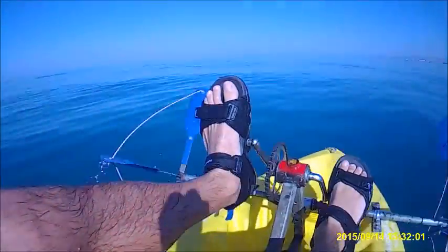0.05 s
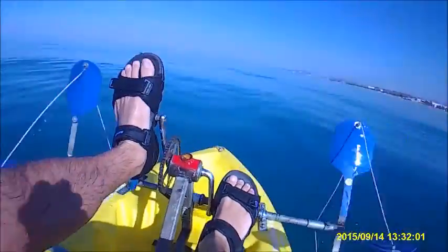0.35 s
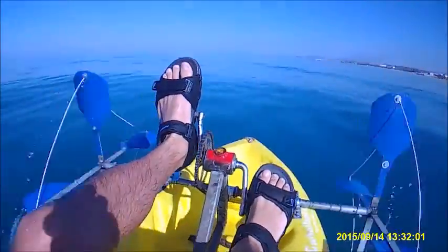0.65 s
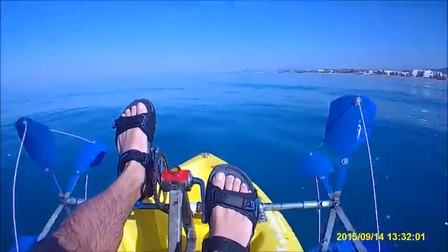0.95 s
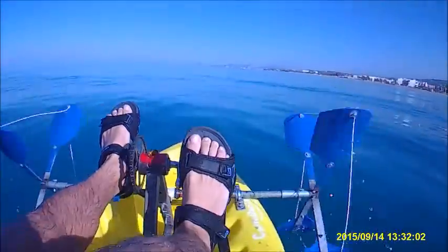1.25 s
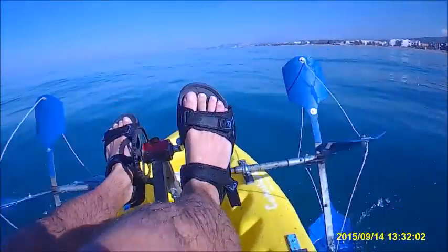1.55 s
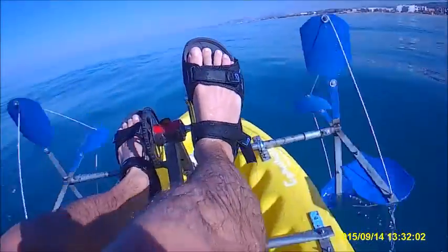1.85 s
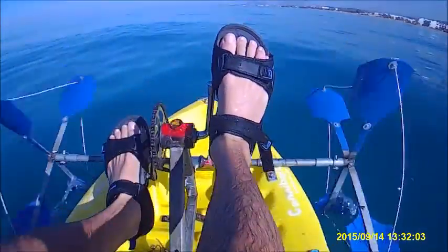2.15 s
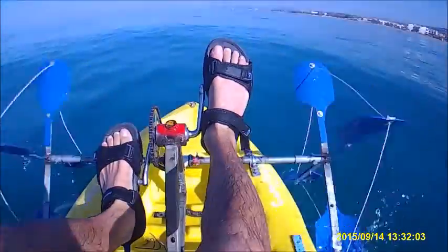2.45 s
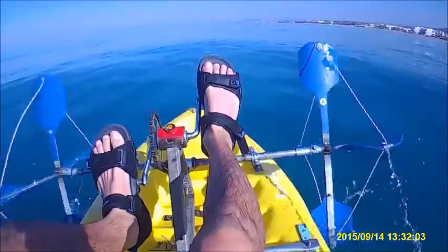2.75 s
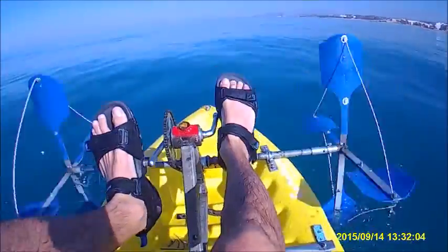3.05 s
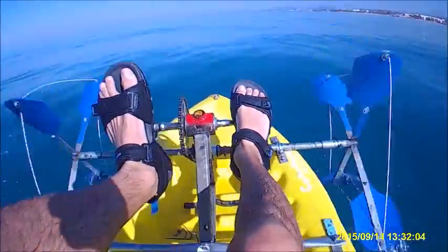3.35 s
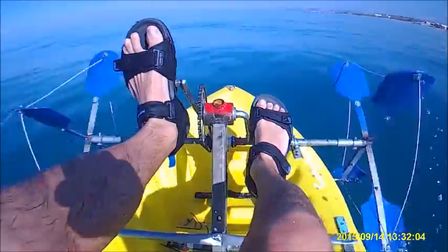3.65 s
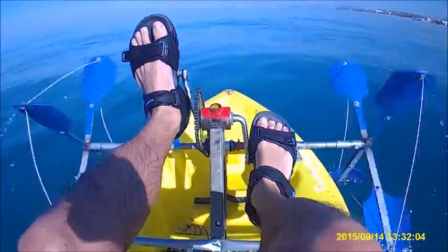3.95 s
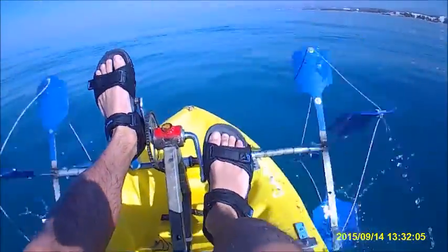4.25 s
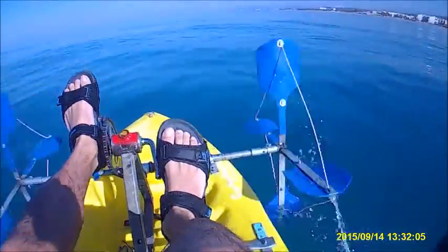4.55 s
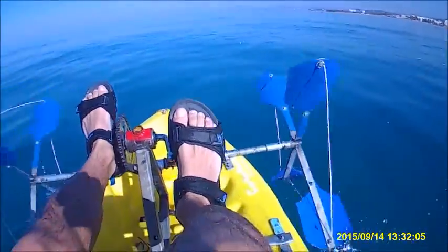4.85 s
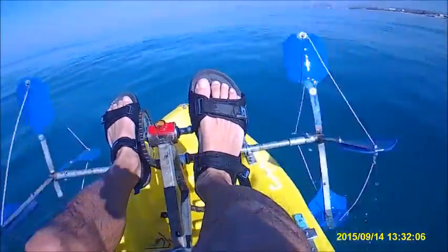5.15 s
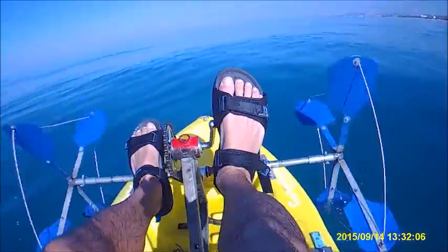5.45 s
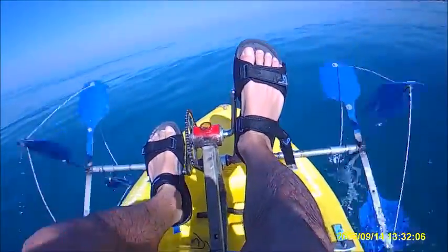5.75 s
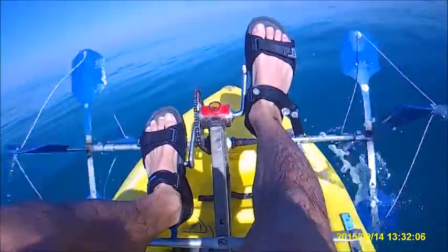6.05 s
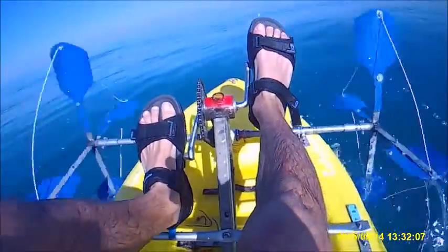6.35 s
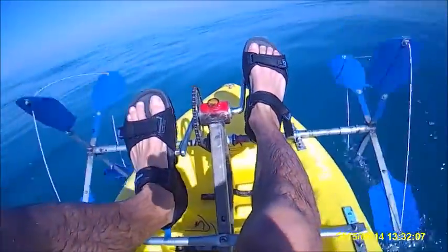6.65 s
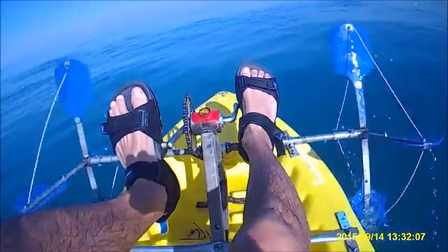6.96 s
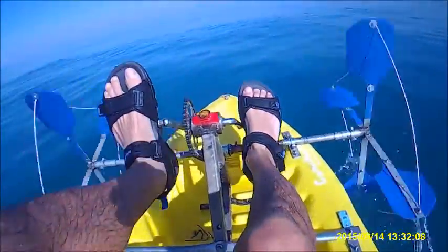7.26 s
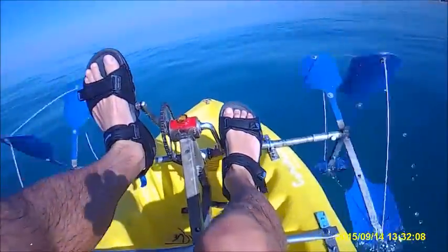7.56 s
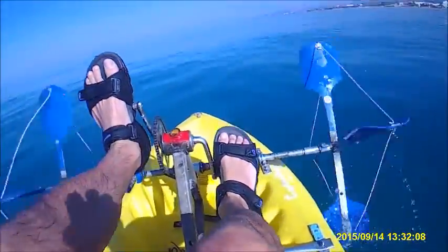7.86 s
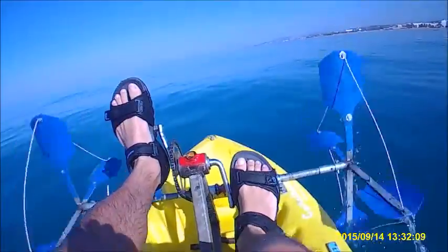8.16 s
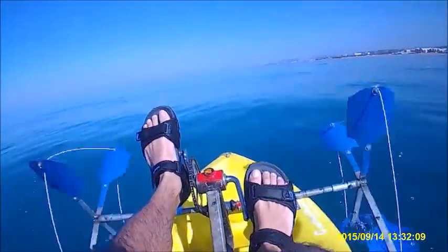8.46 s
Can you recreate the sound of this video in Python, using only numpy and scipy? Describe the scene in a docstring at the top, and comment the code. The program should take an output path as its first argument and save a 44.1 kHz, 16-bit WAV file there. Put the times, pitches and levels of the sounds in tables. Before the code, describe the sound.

A few rubs and knocks sound on a camera's plastic case, right at the microphone, as wind rumbles over it. A pedal kayak's paddle wheels churn a calm sea in repeated swells, with plopping bubbles, spray and drips. Water gurgles and thumps softly under the hollow hull. Toward the end the wind rises and a run of waves smacks the hull with low booms.

```python
"""First you hear rubs and knocks on a camera's waterproof plastic case, while wind rumbles on it.
The camera rides a pedal kayak across a calm sea. With each push on the pedals, two paddle wheels
churn up ringing bubbles and shed spray. Water gurgles under the hollow plastic hull, and small waves
and gusts of wind make soft low thumps. Near the end a run of waves smacks the hull hard,
booming with the air they trap."""
import sys
import numpy as np
from scipy import signal
from scipy.io import wavfile

SR = 44100
rng = np.random.default_rng(int(sys.argv[2]) if len(sys.argv) > 2 else 0)


def store_pcm(level_fs):
    """Save levels as 16-bit WAV."""
    pcm = np.round(np.clip(level_fs, -1, 1) * 32767).astype(np.int16)
    wavfile.write(sys.argv[1], SR, np.atleast_2d(pcm).T)


N = 380141
TIME = np.arange(N) / SR

# Table levels are starting points that the functions turn up or down.
# A fade time (t60) is how long a sound takes to drop by 60 dB.
# something rubs on the case: (time [s], length [s], scrape level [dB], zing level [dB])
RUBS = [(0.027, 0.042, -47.5, -52), (0.17, .03, -49.5, -64), (0.192, 0.11, -45.5, -48.5),
        (0.383, 0.052, -52.5, -69), (0.692, 0.0065, -52.5, -53.5), (0.808, 0.037, -61, -59.5),
        (1.008, 0.0066, -42.5, -48), (1.38, 0.029, -55, -55)]
# the tones the case rings with: (pitch [Hz], level [dB], fade time [s])
CASE_TONES = [(330, -10.5, 0.029), (480, -6, 0.057), (848, 5.5, 0.011), (1300, 3, 0.023), (1590, 4.5, 0.01),
              (2200, -6, 0.02), (2565, -7.5, 0.03), (3280, -11.5, 0.014), (4060, -5, 0.0076),
              (5680, -4.5, 0.015), (6340, -7, 0.0081), (8050, 4, 0.0011)]
# knocks on the case: (time [s], level [dB], brightness [dB per octave])
KNOCKS = [(.353, -41.5, -6), (0.693, -50.5, -12), (0.704, -42, -8), (0.71, -49, 4), (.844, -39.5, 2.5),
          (0.9677, -40.5, 7), (0.9929, -25.5, 2), (0.9983, -35, -8), (1.019, -45, -9), (1.204, -44, 2.5),
          (2.201, -57.5, 12.5)]
# how strongly the wind blows: (time [s], level [dB])
BREEZE = [(0.0, -49), (.18, -52), (.33, -47), (.56, -54), (1.65, -52.5), (2.05, -48), (2.4, -57.5),
          (2.9, -50), (3.6, -48.5), (4.17, -50), (4.9, -46.5), (5.5, -41), (6.05, -40.5), (6.72, -49.5),
          (6.8, -41), (7.25, -41), (7.55, -46.5), (8.0, -46.5), (8.62, -52.5)]
# the tone colour of the wind on the case: (frequency [Hz], level [dB])
WIND_SPECTRUM = [(24, -3), (38, -5), (58, 7), (80, -2.5), (110, 0), (180, -26.5)]
# the far wash of the sea: (frequency [Hz], level [dB])
SEA_SPECTRUM = [(100, 17), (400, 3), (650, -5.5), (1000, 7.5), (1400, -23), (2000, -4), (3500, -24.5),
                (5000, -32.5), (6800, -23)]
# drips off the raised blades: (frequency [Hz], level [dB])
TRICKLE_SPECTRUM = [(2300, -0.5), (2900, -3.5), (4400, 3.5), (5200, -9.5), (6500, -11.5)]
# pushes on the pedals: (time [s], length [s], churn level [dB], spray level [dB])
PEDAL_PUSHES = [(0.19, 0.31, -52.5, -62), (0.587, 0.69, -55.5, -61.5), (1.214, 0.18, -52, -58.5),
                (1.598, 0.059, -54, -61), (2.1, 0.45, -56.5, -63.5), (2.85, 0.15, -55, -59),
                (3.727, .27, -57, -66), (4.008, 0.2, -53, -57.5), (4.31, 0.45, -55, -60),
                (6.072, 0.25, -51, -61.5), (6.317, 0.014, -51, -54.5), (6.448, 0.3, -53, -59),
                (6.85, 0.17, -55.5, -78), (7.895, 0.1, -59, -66.5), (8.346, 0.12, -57.5, -63)]
# froth around the blades: (frequency [Hz], level [dB])
CHURN_SPECTRUM = [(400, -7.5), (650, -4.5), (850, -1), (1100, 5), (1400, 8), (1600, 9), (1800, -29.5),
                  (2000, -34)]
# falling spray: (frequency [Hz], level [dB])
SPRAY_SPECTRUM = [(1800, -25.5), (2100, -8), (2600, 2.5), (3300, -1.5), (4200, -1), (5000, -10.5),
                  (5600, -6), (6400, 4), (7000, -21.5)]
# the finest, brightest spray: (frequency [Hz], level [dB])
MIST_SPECTRUM = [(4500, -19), (6200, -10.5), (7400, 6.5), (8900, -2)]
# drops landing close by: (time [s], level [dB], pitch [Hz])
DROPS = [(0.114, -42.5, 3700), (0.81, -39, 5400), (1.176, -43, 3050), (1.391, -42, 3500),
         (1.483, -39.5, 2500), (2.782, -41.5, 2570), (2.868, -44, 2570), (2.903, -43, 2860),
         (2.97, -44, 4830), (3.033, -44, 3600), (3.159, -56, 4120), (3.607, -47.5, 2660),
         (4.012, -40.5, 2800), (4.171, -38, 3550), (4.389, -43, 3550), (4.416, -44, 3840),
         (4.694, -45.5, 3730), (4.758, -42, 2620), (4.849, -44.5, 3300), (4.93, -48, 3050),
         (5.059, -52, 3697), (5.1407, -54, 3070), (5.655, -48.5, 3100), (5.686, -41, 4350),
         (5.913, -44.5, 2920), (6.103, -43.5, 2570), (6.45, -41, 2870), (7.0136, -32.5, 3820),
         (7.0726, -43, 3420), (7.109, -42, 3100), (7.224, -47.5, 2430), (7.38, -50, 2880),
         (7.399, -51, 4400), (7.435, -50, 4800), (7.587, -49.5, 2940), (7.842, -45.5, 4100),
         (7.9244, -45, 2620), (8.252, -49, 2920), (8.313, -36.5, 2810)]
# single large bubbles: (time [s], level [dB], starting pitch [Hz], fade time [s])
PLOPS = [(0.601, -41, 1350, 0.023), (1.202, -40.5, 1384, 0.057), (1.301, -36, 1373, 0.043),
         (1.347, -34, 1330, 0.027), (1.605, -39, 1450, 0.021), (1.654, -40, 1184, 0.055),
         (1.677, -38.5, 1240, 0.032), (2.204, -29, 674, 0.03), (2.362, -44, 846, 0.048),
         (2.363, -43.5, 1300, 0.043), (2.432, -46, 1680, 0.021), (2.482, -45.5, 1440, 0.037),
         (2.781, -43, 1410, 0.062), (2.825, -40, 1420, .025), (2.849, -41, 1440, 0.044),
         (2.907, -45, 1277, 0.066), (3.402, -46, 943, 0.062), (3.443, -43, 1240, 0.015),
         (4.015, -26.5, 1407, 0.023), (4.379, -41, 1195, 0.056), (4.595, -40.5, 1250, 0.02),
         (4.666, -36, 1370, 0.06), (5.76, -37, 1180, 0.0081), (5.974, -33.5, 1293, 0.042),
         (6.057, -41, 1290, 0.022), (6.232, -40, 1394, 0.054), (6.246, -41.5, 774, 0.028),
         (6.301, -39, 1495, 0.05), (6.573, -44.5, 1310, 0.08), (6.964, -42.5, 1420, 0.019),
         (7.023, -35, 1325, 0.011), (7.182, -37, 1310, 0.025), (7.491, -43.5, 1480, 0.041),
         (7.557, -43, 1056, 0.027), (7.738, -44.5, 1390, 0.013), (7.817, -47.5, 1500, 0.047),
         (7.845, -45, 1580, 0.045), (7.926, -38.5, 1365, 0.048), (8.064, -37, 1536, 0.024),
         (8.313, -38.5, 1430, 0.029)]
# rising air pockets: (time [s], level [dB], starting pitch [Hz], final pitch [Hz], length [s])
GLUGS = [(1.962, -49.5, 807, 1620, 0.023), (2.802, -50, 885, 1410, 0.055), (3.286, -48, 1010, 1565, 0.06),
         (7.338, -56.5, 874, 1153, 0.071), (7.799, -56, 2280, 3080, 0.0089),
         (7.907, -59, 1000, 1400, 0.015), (8.074, -50.5, 2230, 3280, 0.0092),
         (8.348, -52, 1056, 1540, 0.033)]
# waves washing along the hull: (time [s], length [s], rumble level [dB], gurgle level [dB])
SLOSHES = [(0.254, 0.045, -43.5, -39), (0.368, 0.26, -49.5, -49), (0.822, 0.26, -55.5, -53),
           (1.203, 0.29, -47, -50.5), (2.102, 0.02, -38, -56), (2.63, 0.27, -66, -51.5),
           (2.963, 0.16, -49.5, -47), (3.736, 0.081, -40.5, -57), (4.328, 0.05, -42, -47),
           (4.521, 0.05, -41, -40.5), (5.243, 0.0047, -37, -72), (5.33, 0.047, -40.5, -49.5),
           (5.41, 0.014, -42, -64), (5.563, 0.023, -41, -69), (5.795, 0.012, -40, -50),
           (5.949, 0.15, -45, -50), (6.125, 0.045, -36.5, -50), (6.302, 0.033, -41, -42.5),
           (6.488, 0.016, -37.5, -45.5), (6.785, 0.03, -34, -42), (6.848, 0.083, -49, -41),
           (7.02, 0.019, -42, -35.5), (7.122, 0.024, -50, -41), (7.213, 0.072, -61, -45.5),
           (7.472, 0.094, -37, -53), (7.625, 0.12, -41, -57.5), (8.041, 0.061, -41, -48.5),
           (8.414, 0.049, -47.5, -54), (8.593, 0.0098, -61, -42.5)]
# the deep rumble of the hull: (frequency [Hz], level [dB])
RUMBLE_SPECTRUM = [(65, -10), (100, 0), (125, 1.5), (175, 0.5), (250, -24.5), (380, -45)]
# water gurgling under the hull: (frequency [Hz], level [dB])
GURGLE_SPECTRUM = [(150, 5.5), (220, -1.5), (300, 1.5), (370, -8.5), (470, -16.5), (700, -40.5)]
# soft low thumps from small waves on the hull and gusts of wind:
# (time [s], level [dB], pitch [Hz], fade time [s])
THUMPS = [(0.355, -21.5, 100, 0.073), (0.54, -34, 291, 0.14), (0.892, -30, 78, 0.057),
          (1.202, -32.5, 295, 0.026), (1.481, -29.5, 282, 0.033), (2.191, -17, 221, 0.02),
          (2.198, -27, 157.7, 0.23), (2.817, -29, 129, 0.064), (2.987, -37, 171, 0.24),
          (2.993, -32.5, 334, 0.026), (3.075, -28.5, 307, 0.079), (3.472, -27.5, 125, 0.082),
          (3.723, -27.5, 149, 0.059), (4.328, -29.5, 138, 0.2), (4.452, -30.5, 208, 0.041),
          (4.547, -28.5, 227, 0.044), (4.571, -28, 131, 0.24), (4.995, -31, 101, 0.11),
          (5.117, -22.5, 152, 0.027), (5.325, -23.5, 116, 0.041), (5.523, -22.5, 110, 0.042),
          (5.733, -26.5, 158, 0.034), (5.997, -20.5, 148, 0.08), (6.19, -23.5, 143, 0.029),
          (7.411, -23.5, 118, 0.069), (7.536, -29, 125, 0.043), (7.74, -31, 111, 0.11)]
# the tones the hollow hull rings with: (pitch [Hz], level [dB], fade time [s])
HULL_TONES = [(130, -30.5, 0.023), (171.3, -13.5, 0.12), (258, -36, 0.036)]
# waves hitting the hull hard:
# (time [s], smack level [dB], smack pitch [Hz], boom level [dB], boom pitch [Hz], boom length [s])
SMACKS = [(0.383, -31, 860, -31.5, 198, 0.012), (0.839, -43, 1400, -38.5, 198, 0.0086),
          (5.979, -52, 1250, -35.5, 135, 0.019), (6.285, -55, 1200, -32.5, 163, 0.013),
          (6.306, -36, 1200, -31.5, 172.3, 0.048), (6.7586, -36, 1000, -25, 127, 0.034),
          (6.843, -42, 1410, -31.5, 160, 0.041), (6.892, -35.5, 1270, -26.5, 97, 0.042),
          (6.9626, -48, 1300, -33, 140, 0.049), (7.017, -35.5, 1140, -27, 150.3, 0.046),
          (7.084, -38, 1150, -30, 162, 0.017), (7.111, -37.5, 1090, -28.5, 129, 0.054),
          (7.181, -50, 1100, -33, 133, 0.016), (7.222, -43, 1290, -30.5, 124, 0.039),
          (7.492, -55, 1300, -48, 128, 0.03)]


def from_db(db):
    """Turn decibels into a number to multiply a sound by."""
    return np.exp(np.asarray(db) * (np.log(10) / 20))


def unit_power(x):
    """Scale a signal so its average power is 1."""
    return x / np.sqrt(np.mean(x ** 2) + 1e-20)


def level_at(spectrum, hz):
    """Read a spectrum's level in dB at a frequency."""
    frequencies, levels_db = np.transpose(spectrum)
    return np.interp(np.log(hz), np.log(frequencies), levels_db)


def add(out, s, sound):
    """Mix a sound in, starting s seconds from the beginning."""
    i = int(np.clip(s * SR, 0, N - 1))
    out[i:i + len(sound)] += sound[:N - i]


def filtered(x, hz, kind, order=2):
    """Keep what lies below one frequency ("low") or between two ("band")."""
    return signal.sosfilt(signal.butter(order, hz, kind, fs=SR, output="sos"), x)


def drift(rate_hz):
    """A smooth random wobble of about plus or minus 1; a higher rate wobbles faster."""
    step, warm_up = 40, 2000
    pole = np.exp(-2 * np.pi * rate_hz * step / SR)
    noise = rng.standard_normal(N // step + warm_up + 2)
    smooth = signal.lfilter([1], [1, -2 * pole, pole * pole], noise)[warm_up:]
    return np.repeat(unit_power(smooth), step)[:N]


def swells(events, rise_s, t60):
    """Two gain curves, one per level column: each event builds, holds and fades; the loudest wins."""
    t = TIME[::40]
    start, length, *levels_db = np.transpose(events)[:, :, None]
    build_db = -6 * (np.maximum(start - t, 0) / rise_s) ** 2
    fade_db = -60 * np.maximum(t - start - length, 0) / t60
    loudest_db = [np.max(db + build_db + fade_db, axis=0) for db in levels_db]
    return [np.interp(TIME, t, from_db(np.maximum(db, -150))) for db in loudest_db]


def over_background(gain, background_db):
    """The level in dB of a swelling sound plus its background."""
    return 20 * np.log10(np.hypot(gain, from_db(background_db)))


def random_clicks(per_s, spread_db):
    """Clicks at random times, many small and a few large."""
    sizes = from_db(spread_db * np.minimum(rng.exponential(1, N), 4))
    return (rng.random(N) < per_s / SR) * sizes * rng.choice([-1, 1], N)


def ring(clicks, hz, t60):
    """Each click starts a pure tone that dies away."""
    decay, angle = from_db(-60 / (t60 * SR)), 2 * np.pi * hz / SR
    return signal.lfilter([0, np.sin(angle)], [1, -2 * decay * np.cos(angle), decay ** 2], clicks + 1e-18)


def tone(hz):
    """A pure tone that follows a changing pitch."""
    return np.sin(2 * np.pi * np.cumsum(hz) / SR)


def fade(t60, attack):
    """The times and loudness shape of a short sound; attack is its rise time in seconds."""
    t = np.arange(int(t60 * SR) + 2) / SR
    shape = (1 - np.exp(-t / attack)) * from_db(-60 * t / t60)
    return t, shape / shape.max()


def burst(hz, octaves, t60, attack):
    """A dying puff of noise around a pitch."""
    t, shape = fade(t60, attack)
    edges = np.clip([hz / 2 ** (octaves / 2), hz * 2 ** (octaves / 2)], 10, SR / 2 - 1)
    noise = np.resize(rng.standard_normal(size=4096), len(t))
    puff = filtered(shape * noise, edges, "band")
    return puff / np.abs(puff).max()


def fluttering_noise(spectrum, depth_db, rate_hz, bands):
    """Noise split into bands, each growing louder and softer mostly on its own."""
    edges = np.geomspace(spectrum[0][0], spectrum[-1][0], bands + 1)
    out, together, white = 0, drift(rate_hz), rng.standard_normal((2, N))
    for k, (low, high) in enumerate(zip(edges, edges[1:])):
        band = filtered(white[k % 2], [low, high], "band")
        flutter_db = depth_db * (0.5 * together + drift(rate_hz))
        out = out + band * from_db(level_at(spectrum, np.sqrt(low * high)) + flutter_db)
    return unit_power(out)


def ping(hz, t60, attack, rise=0, glide_s=0.14):
    """A dying tone; with `rise` (octaves a second at first) it climbs like a surfacing bubble."""
    t, shape = fade(t60, attack)
    octaves_up = rise * glide_s * np.tanh(t / glide_s)
    return shape * tone(hz * 2 ** octaves_up)


def bubble_swarm(spectrum, spread_db, cycles, rise, count):
    """Bubbles born at random, many faint and a few loud, each ringing for about `cycles` vibrations."""
    when, size, pitch, life, glide = rng.random((count, 5)).T
    pitches = spectrum[0][0] + pitch * (spectrum[-1][0] - spectrum[0][0])
    gains = from_db(level_at(spectrum, pitches) - spread_db * np.log(np.maximum(size, 0.02)))
    fade_times = cycles * (0.5 + life) / pitches
    out = np.zeros(N)
    for s, gain, hz, t60, climb in zip(when * N / SR, gains, pitches, fade_times, 2 * rise * glide):
        add(out, s, gain * ping(hz, t60, attack=4 / hz, rise=climb))
    return unit_power(out)


def case_rubs(tilt_db_per_octave=1.5, zing_hz=5480):
    """Rubbing is a stream of tiny slips that ring the plastic case and add a high zing."""
    slips = random_clicks(3200, spread_db=3.6) * from_db(1.5 * drift(45))
    scrape = 0
    for k, (hz, db, t60) in enumerate(CASE_TONES):
        gain = from_db(db + tilt_db_per_octave * np.log2(hz))
        scrape = scrape + (-1) ** k * gain * ring(slips, hz, t60 / 2)  # every other tone is flipped
    zing = ring(slips, zing_hz, t60=0.0045)
    scrape_gain, zing_gain = swells(RUBS, rise_s=0.0077, t60=0.11)
    return scrape_gain * unit_power(scrape) + zing_gain * unit_power(zing)


def case_knocks(middle_hz=1500, crunch_db=-7):
    """Each knock rings the case and crunches briefly as the surfaces grind."""
    out = np.zeros(N)
    for k, (hz, tone_db, t60) in enumerate(CASE_TONES):
        blows = np.zeros(N)
        for s, db, brightness in KNOCKS:
            add(blows, s, from_db([db + tone_db + brightness * np.log2(hz / middle_hz)]))
        out += (-1) ** k * ring(blows, hz, t60) / 2
    for s, db, _ in KNOCKS:
        add(out, s, from_db(db + crunch_db) * burst(middle_hz, octaves=3.5, t60=0.018, attack=0.0003))
    return out


def wind(breeze_db, trim_db=-2, gust_db=2):
    """Air buffets the case in quick random gusts."""
    gain = from_db(breeze_db + trim_db + gust_db * drift(16))
    return gain * fluttering_noise(WIND_SPECTRUM, depth_db=4, rate_hz=14, bands=5)


def open_sea(level_db=-59.3):
    """Far-off water blends into a smooth wash."""
    return from_db(level_db) * fluttering_noise(SEA_SPECTRUM, depth_db=1, rate_hz=10, bands=9)


def trickle(level_db=-77):
    """Crisp drips fall off the raised blades and leave tiny ringing bubbles."""
    return from_db(level_db) * bubble_swarm(TRICKLE_SPECTRUM, spread_db=3.5, cycles=22, rise=10, count=330)


def paddle_wheels():
    """Each push on the pedals drives the blades through the water, so churning and spray swell."""
    churn_gain, spray_gain = swells(PEDAL_PUSHES, rise_s=0.096, t60=1.56)
    churn_db = over_background(churn_gain, background_db=-65)
    spray_db = over_background(spray_gain, background_db=-73)
    return churn(churn_db) + spray(spray_db) + splashes()


def churn(level_db, bubbles_db=-2, wash_db=-3.5, gulp_db=1.83, top_hz=1720):
    """The blades drag air under in uneven gulps, making a froth of bubbles in sloshing water."""
    bubbles = bubble_swarm(CHURN_SPECTRUM, spread_db=2.9, cycles=19, rise=9, count=2700)
    wash = fluttering_noise(CHURN_SPECTRUM, depth_db=2.2, rate_hz=35, bands=8)
    froth = filtered(from_db(bubbles_db) * bubbles + from_db(wash_db) * wash, top_hz, "low", order=10)
    return from_db(level_db + gulp_db * drift(16)) * froth


def spray(level_db, heavy_spray_db=-58):
    """Droplets tick and leave tiny bubbles; the finest merge into hiss, and heavy spray adds mist."""
    drips = bubble_swarm(SPRAY_SPECTRUM, spread_db=3.7, cycles=18, rise=6, count=5000)
    ticks = unit_power(filtered(random_clicks(380, spread_db=4.4), [2400, 6200], "band"))
    hiss = fluttering_noise(SPRAY_SPECTRUM, depth_db=2.3, rate_hz=30, bands=10)
    patter = 0.78 * drips + 0.4 * ticks + 0.66 * hiss
    mist_db = -10.5 + 0.37 * (level_db - heavy_spray_db)
    mist = from_db(mist_db) * fluttering_noise(MIST_SPECTRUM, depth_db=3, rate_hz=27, bands=4)
    strings_db = 1.3 * drift(25)  # water leaves the blades in uneven strings
    return from_db(level_db + strings_db) * (patter + mist)


def splashes(plop_db=0.5, splat_db=-2.5, plink_db=-11.5):
    """Big bubbles plop and glug; each nearby drop lands with a splat and a faint plink at once."""
    out = np.zeros(N)
    for s, db, hz, t60 in PLOPS:
        add(out, s, from_db(db + plop_db) * ping(hz, t60, attack=t60 * 0.015, rise=10))
    for s, db, start_hz, end_hz, length in GLUGS:
        add(out, s, from_db(db) * glug(start_hz, end_hz, length))
    for s, db, hz in DROPS:
        add(out, s, from_db(db + splat_db) * burst(hz, octaves=0.75, t60=0.03, attack=0.0004))
        add(out, s, from_db(db + plink_db) * ping(hz, t60=0.034, attack=0.00063, rise=10))
    return out


def waves(breeze_db, light_breeze_db=-48, wind_share=0.75):
    """Water laps at the hull, rumbling more as the wind rises; passing waves swell rumble and gurgle."""
    rumble_gain, gurgle_gain = swells(SLOSHES, rise_s=0.0085, t60=0.24)
    wind_lift_db = wind_share * (breeze_db - light_breeze_db)
    rumble_db = over_background(rumble_gain, -50.5 + wind_lift_db - 0.5 * drift(26))
    gurgle_db = over_background(gurgle_gain, -53 + 2.5 * drift(10.6))
    gurgle = fluttering_noise(GURGLE_SPECTRUM, depth_db=2.2, rate_hz=25, bands=8)
    smacks = hull_smacks()
    rumble = fluttering_noise(RUMBLE_SPECTRUM, depth_db=3, rate_hz=19.3, bands=4)
    return from_db(rumble_db) * rumble + from_db(gurgle_db) * gurgle + smacks


def soft_thumps(thud_db=-2, top_hz=450):
    """Small waves on the hull and gusts of wind make soft low thumps, each with a hollow ring."""
    thuds, pushes = np.zeros(N), np.zeros(N)
    for s, db, hz, t60 in THUMPS:
        add(thuds, s, from_db(db + thud_db) * ping(hz, t60, attack=0.0024))
        add(pushes, s, from_db([db]))
    shell = sum(from_db(db) * ring(pushes, hz, t60) for hz, db, t60 in HULL_TONES)
    return filtered(thuds + shell, top_hz, "low")  # a soft blow has no treble


def hull_smacks():
    """A wave hits hard and splatters; a hull panel knocks, and the hollow beneath booms and shakes."""
    out = np.zeros(N)
    for s, smack_db, hz, boom_db, boom_hz, length in SMACKS:
        crack = ping(hz, t60=0.007, attack=0.0001)
        splatter = burst(hz, octaves=0.9, t60=0.034, attack=0.0003)
        crackle = burst(3500, octaves=0.7, t60=0.018, attack=0.0002)
        for sound, trim_db in (crack, -1), (splatter, -3), (crackle, -9):
            add(out, s, from_db(smack_db + trim_db) * sound)
        slam = ping(230, t60=0.022, attack=0.00051)
        panel = ping(288 * rng.uniform(0.873, 1.098), t60=0.11, attack=0.0011)
        air = boom(boom_hz, length)
        shake = burst(271, octaves=0.63, t60=3 * length, attack=0.0005)
        for sound, trim_db in (slam, 1), (panel, -5), (air, 0), (shake, -8):
            add(out, s, from_db(boom_db + trim_db) * sound)
    return out


def boom(hz, length, wander_octaves=0.14, wander_s=0.009, attack=0.003):
    """Air trapped under a wave throbs at an unsteady pitch until it escapes."""
    t = np.arange(int(2 * length * SR)) / SR
    wander = np.interp(t / wander_s, np.arange(32), rng.standard_normal(size=32))
    shape = (1 - np.exp(-t / attack)) * np.exp(-(t / length) ** 6)
    return shape * tone(hz * 2 ** (wander_octaves * wander))


def glug(start_hz, end_hz, length, wobble_db=3, pitch_wobble=0.026):
    """An air pocket rises: its tone starts quickly, wobbles upward and fades at the surface."""
    progress = np.linspace(0, 1, int(length * SR))
    wobble = np.interp(progress, np.linspace(0, 1, 9), rng.standard_normal(size=9))
    hz = (start_hz + progress * (end_hz - start_hz)) * (1 + pitch_wobble * wobble)
    shape = np.sin(np.pi * progress ** 0.51)
    return from_db(wobble_db * wobble) * shape * tone(hz)


def scene():
    """Mix the kayak and the case with the wind and the sea, in one channel."""
    breeze_db = np.interp(TIME, *np.transpose(BREEZE))
    kayak = paddle_wheels() + waves(breeze_db) + soft_thumps()
    case = case_rubs() + case_knocks()
    return (kayak + case + wind(breeze_db) + open_sea() + trickle())[None]


def record(dry, notch_hz=7400, top_hz=8900):
    """The closed case cancels a narrow band of treble, and the highest sounds are cut off."""
    b, a = signal.iirnotch(notch_hz, Q=5, fs=SR)
    muffled = signal.lfilter(b, a, signal.lfilter(b, a, dry))
    steep_cut = signal.ellip(12, 0.3, 80, top_hz, fs=SR, output="sos")
    return signal.sosfilt(steep_cut, muffled)


dry = scene()
out = record(dry)
store_pcm(out)
```